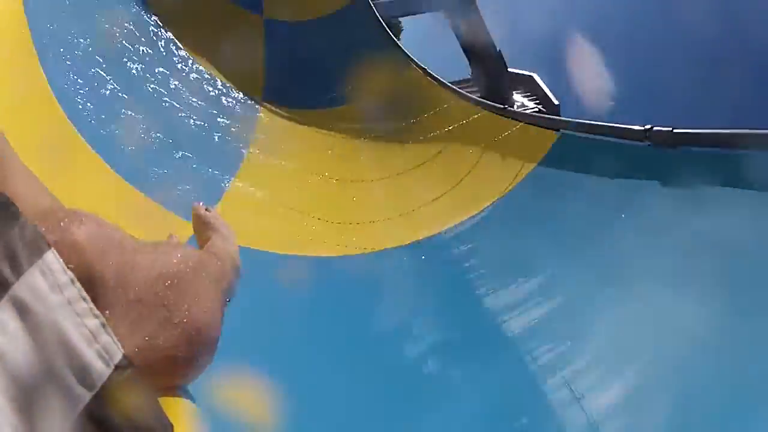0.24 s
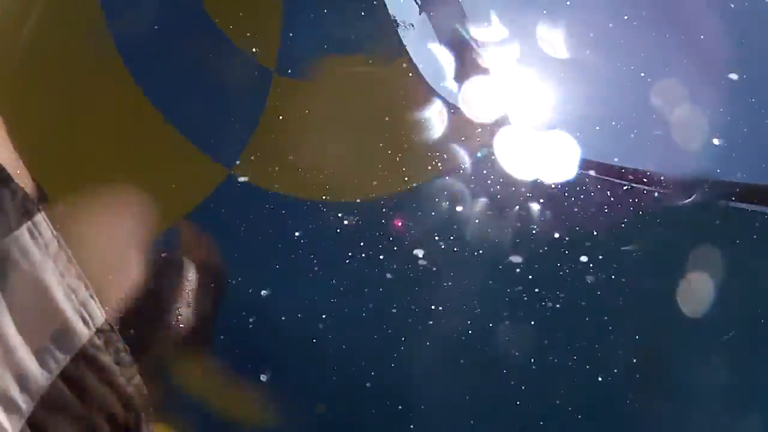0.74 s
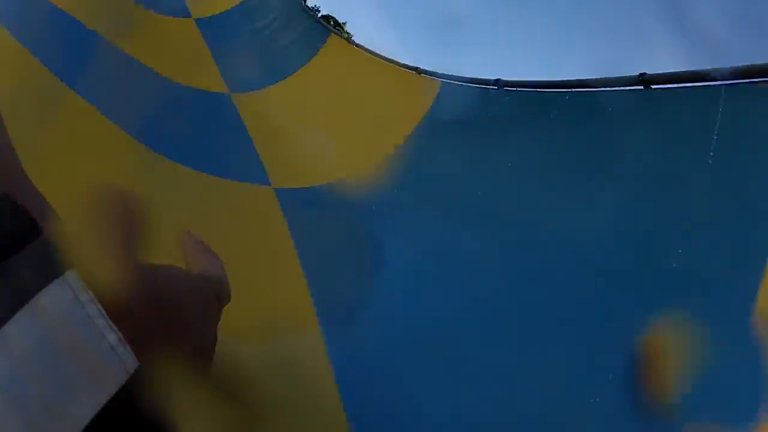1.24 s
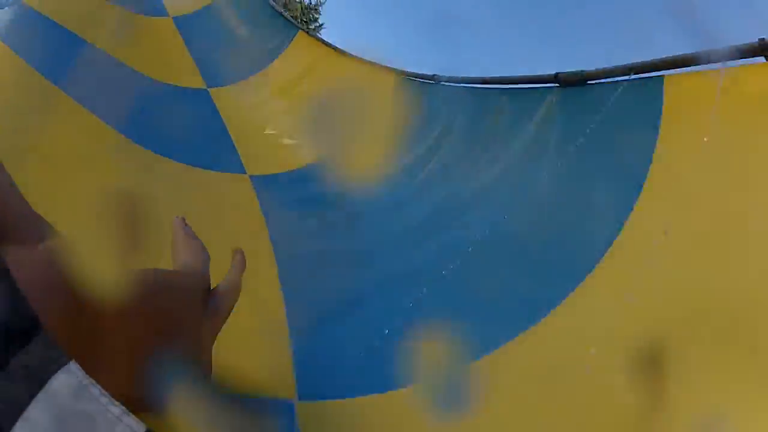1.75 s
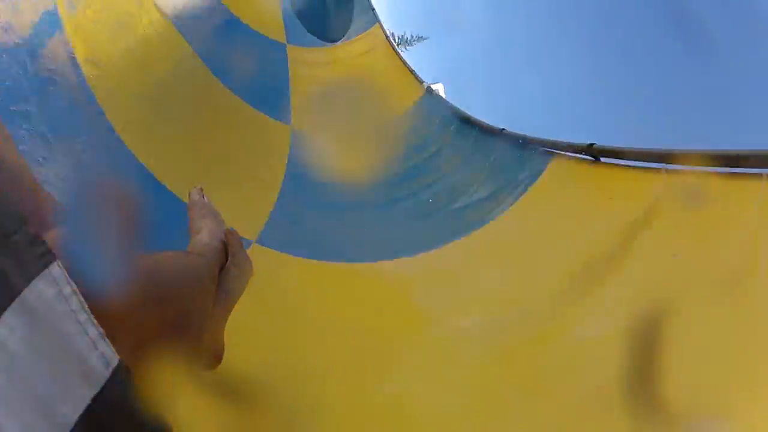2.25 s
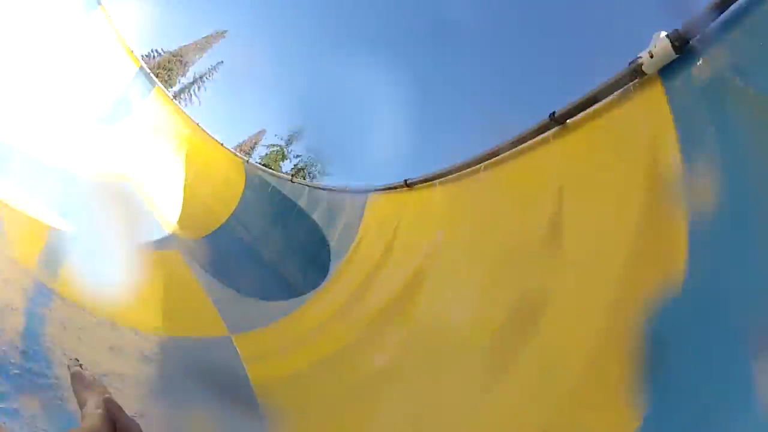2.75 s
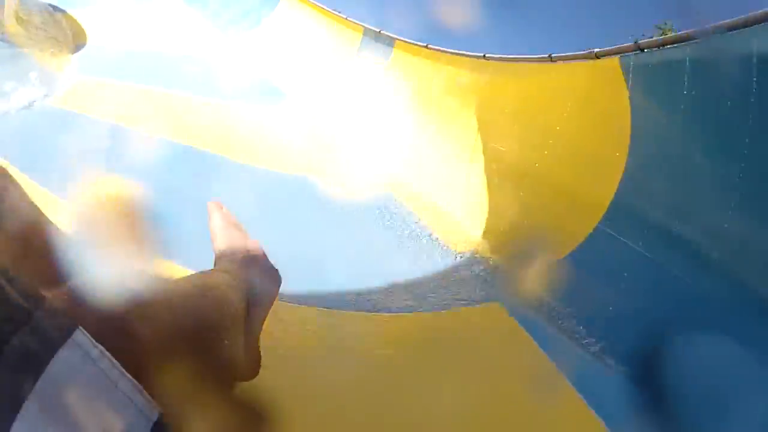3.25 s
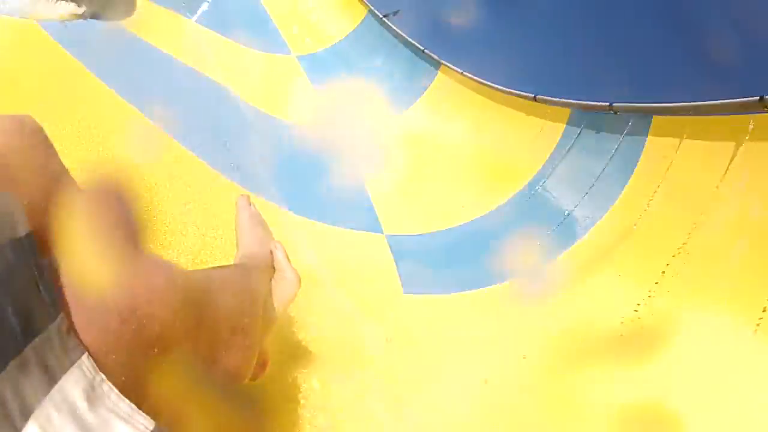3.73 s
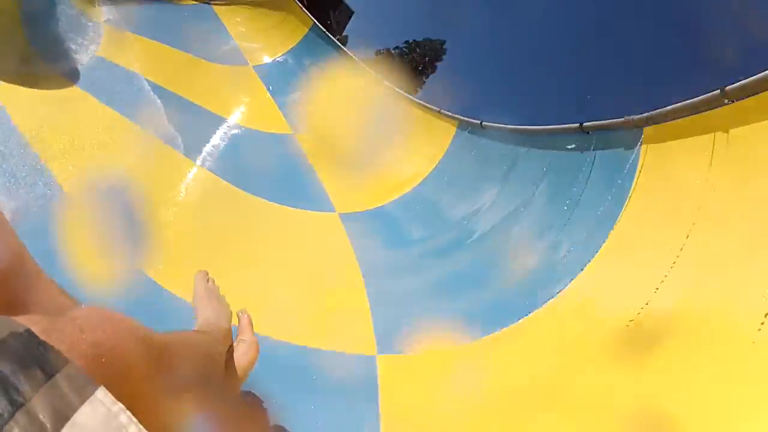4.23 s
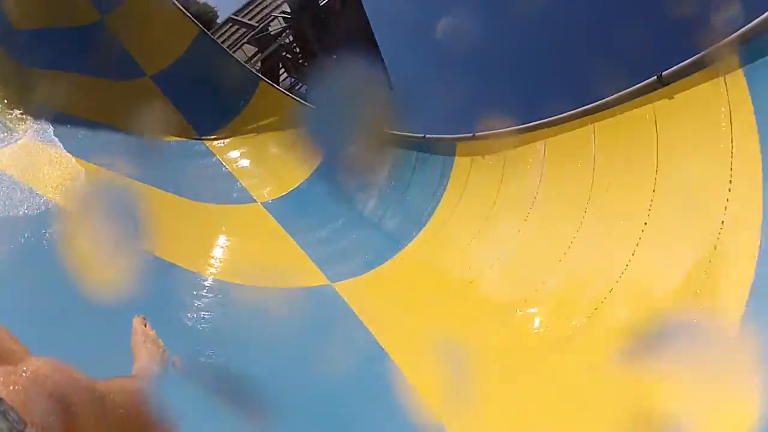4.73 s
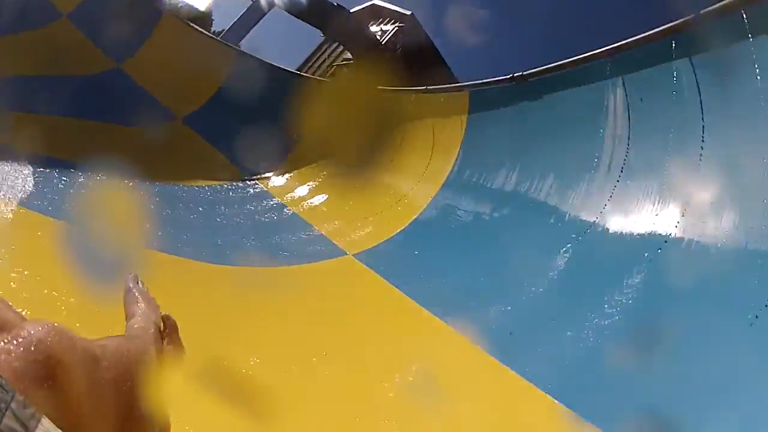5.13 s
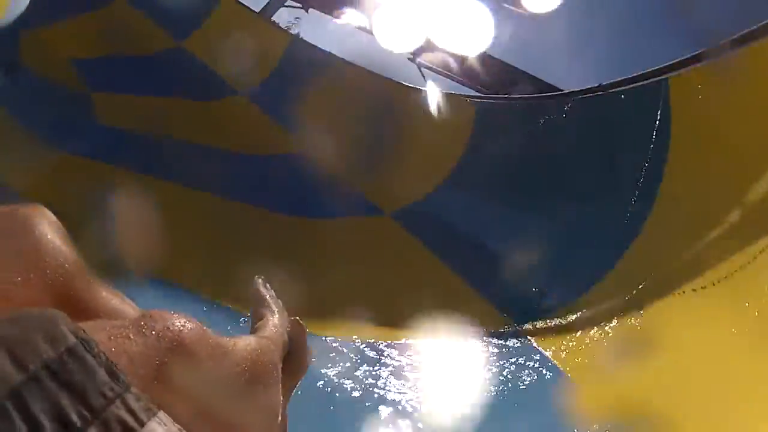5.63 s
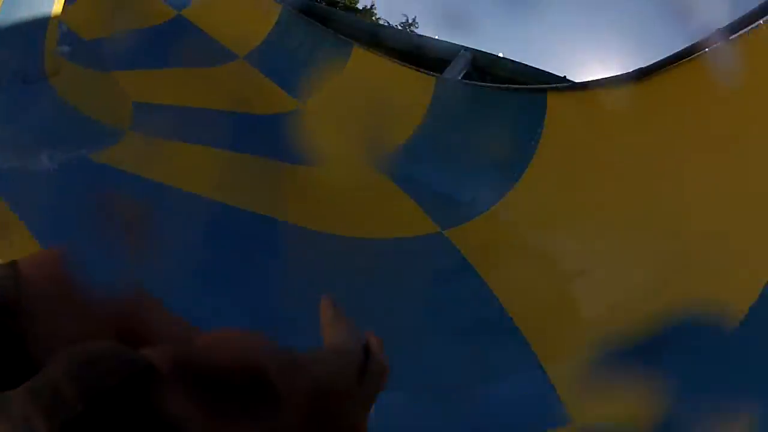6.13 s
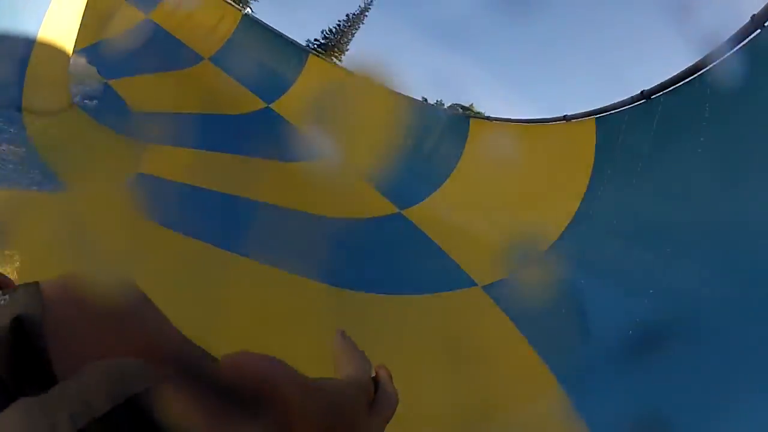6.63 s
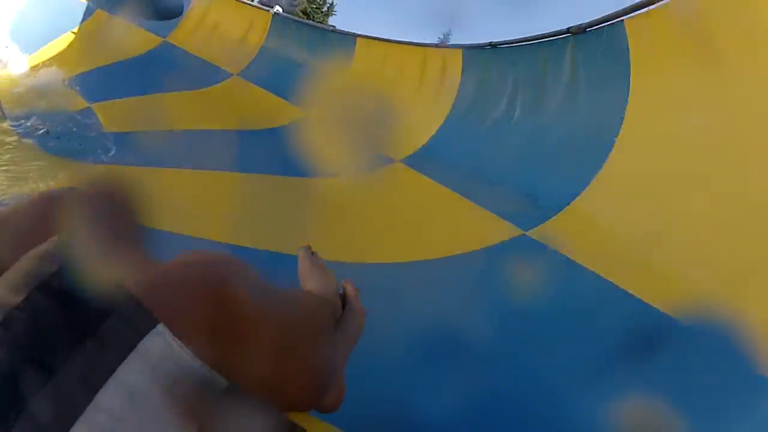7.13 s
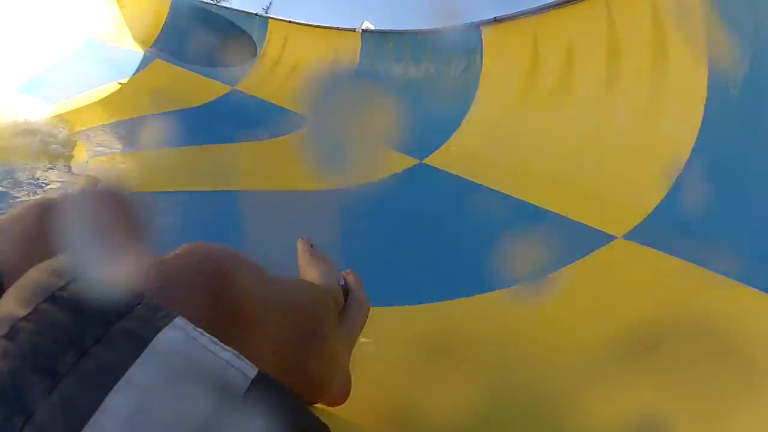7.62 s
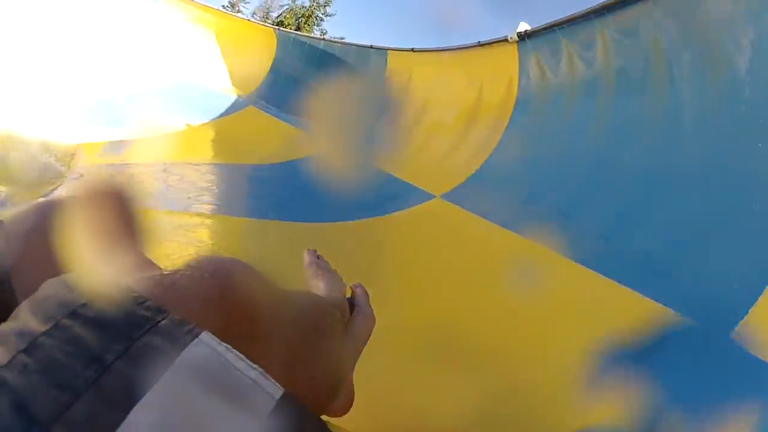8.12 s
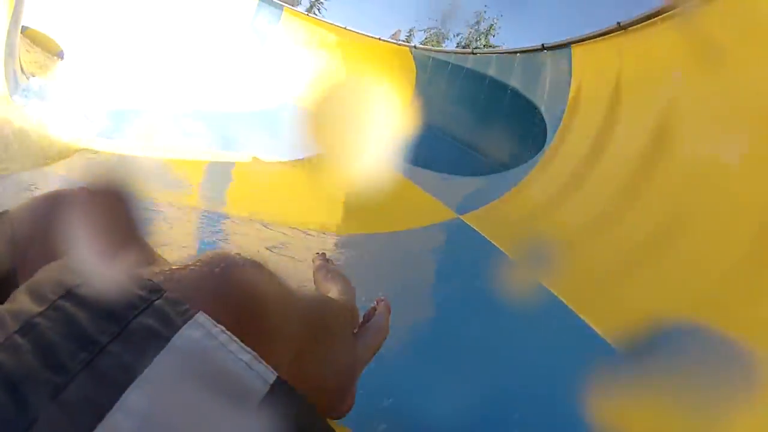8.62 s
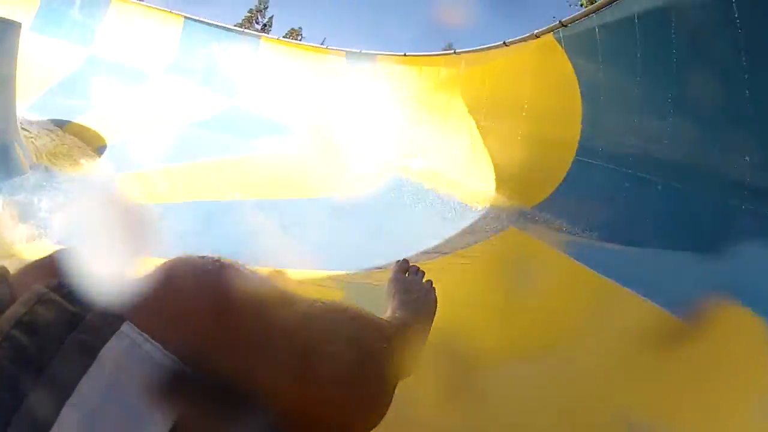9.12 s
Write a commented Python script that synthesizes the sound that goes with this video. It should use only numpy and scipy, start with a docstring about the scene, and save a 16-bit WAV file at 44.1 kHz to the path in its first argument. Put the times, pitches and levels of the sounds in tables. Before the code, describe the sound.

Muffled, lumpy rumble of a water slide ride, with rushing water and sharp, close taps of spray on a camera case.

```python
"""Down a water slide, from inside a camera case.

The microphone rides in a sealed case down a fibreglass slide into a wide bowl. The sliding body shakes
the case in low lumps, water rushes past just outside, and drops and spray knock on the shell, very close.
The recorder holds each of 12000 samples a second, which mirrors the sound into the treble."""
import sys
import numpy as np
from scipy import signal
from scipy.fft import rfft, irfft
from scipy.io import wavfile
from scipy.ndimage import uniform_filter1d

SR = 44100
rng = np.random.default_rng(int(sys.argv[2]) if len(sys.argv) > 2 else 0)


def master_out(mix):
    """Clip the mix to full scale and print it as 16-bit PCM to the path in sys.argv[1]."""
    frames = np.transpose(np.atleast_2d(mix))
    ceiling = np.clip(frames, -1, 1)
    pcm = np.round(ceiling * 32767).astype(np.int16)
    wavfile.write(sys.argv[1], SR, pcm)


N = 413216

# Water passing the case: (time [s], level [dB], middle tones [dB re level], fizz [dB re level])
WATER = [(0.0, -42.5, -4.5, -6), (0.31, -44.5, 0, 0), (0.63, -41.5, -6, -6), (0.75, -44.5, 9.5, -1.5),
         (1.23, -46.5, 4.5, -3), (1.54, -48, 14, -2), (1.8, -46.5, 2, -0.5), (2.4, -44.5, 1.5, -1.5),
         (2.61, -47, 1, 1), (3.05, -46, -2, -2.5), (3.3, -44, 5.5, -1.5), (3.62, -40, -5.5, 2.5),
         (3.81, -43.5, -0.5, 1), (3.97, -42, -6, 5.5), (4.1, -42, -11, 3), (4.25, -46, -12, -1),
         (4.91, -48, -8.5, -4), (5.4, -47, -7, -4), (5.65, -49, -6.5, -3), (6.6, -50, -9, -1.5),
         (6.85, -50, 4, -3.5), (7.15, -50, -1.5, -0.5), (7.8, -52, -4, 0.5), (8.38, -49.5, -3.5, -0.5),
         (8.6, -50, -3, 0.5), (8.9, -49, -2, 0.5), (9.37, -45.5, -4.5, 0.5)]


def gain_of(db):
    """Decibels to a factor."""
    return 10 ** (np.asarray(db) / 20)


def evened(x):
    """Scales to rms 1."""
    return x / np.sqrt(np.mean(x ** 2) + 1e-20)


def add(mix, s, sound):
    """Mixes a sound in at s seconds."""
    part = mix[round(s * SR):][:len(sound)]
    part += sound[:len(part)]


def ride(table, column, t):
    """One control of the ride at times t."""
    rows = np.array(table)
    return np.interp(t, rows[:, 0], rows[:, column])


def coloured(x, spectrum):
    """Filters x by (Hz, dB) points joined on a log-frequency axis; rms 1."""
    hz, db = np.transpose(spectrum)
    curve_db = np.interp(np.log(np.fft.rfftfreq(N, 1 / SR) + 1), np.log(hz + 1), db)
    return evened(irfft(rfft(x) * gain_of(curve_db), N))


def rush():
    """Water just outside the case: noise in drifting patches, fine droplets; near water adds middle tones."""
    # Water heard through the shell: (frequency [Hz], relative density [dB])
    spectrum = [(90, -42), (150, -8), (500, -16.5), (980, -8.5), (1500, -14), (1760, -12), (1900, -7.5),
                (2330, -3), (2700, -10), (3350, -17), (3740, -10), (4150, -21), (5300, -18.5),
                (6200, -21.5), (8000, -72)]
    droplets = gain_of(2.02 * np.minimum(rng.exponential(1, N), 5))
    droplets *= rng.random(N) < 1500 / SR  # about 1500 a second
    drive = rng.standard_normal(N) + .5 * evened(droplets * rng.standard_normal(N))
    hz, t, bands = signal.stft(coloured(drive, spectrum), SR, nperseg=512, noverlap=384)
    hz = hz[:, None]
    patches = evened(uniform_filter1d(uniform_filter1d(rng.standard_normal(bands.shape), 6, 0), 20, 1))
    flicker = evened(uniform_filter1d(rng.standard_normal(len(t)), 4))
    middle = 0.65 * np.exp(-np.log(hz / 1000 + 1e-9) ** 2 / 0.13)
    middle += 0.13 * np.exp(-((hz - 990) / 110) ** 2)  # a hollow ring
    middle += 0.54 * np.exp(-((hz - 1680) / 150) ** 2)  # fills the gap under the main band
    fizz = np.clip(np.log2(hz / 2800 + 1e-9), 0, 1)
    tone_db = middle * ride(WATER, 2, t) + fizz * ride(WATER, 3, t)
    level_db = ride(WATER, 1, t) + 0.65 * patches + 0.76 * flicker
    return signal.istft(bands * gain_of(level_db + tone_db), SR, nperseg=512, noverlap=384)[1][:N]


def shaking():
    """The body skips over the wet slide: lumpy rumble and a fuzzy drone; speed moves their tone."""
    # Rumble inside the case: (frequency [Hz], relative density [dB])
    spectrum = [(8.8, -52), (15, 5.5), (85, -5.5), (127, -4), (167, -10), (238, -17), (439, -25),
                (587, -27), (700, -33), (910, -82), (1540, -120)]
    # The skipping body: (time [s], level [dB], upper rumble [dB re deep rumble], hull drone [Hz])
    skipping = [(0.0, -40, -0.5, 101), (0.18, -36.5, 1, 91), (0.35, -45, 5.5, 78), (0.6, -37, 5, 84),
                (0.8, -39.5, 6, 112), (1.23, -35.5, -3, 85), (1.54, -39, 1, 79), (1.85, -36, -0.5, 84),
                (2.45, -43, 4.5, 106), (3.05, -36, -2.5, 75.4), (3.3, -53.5, 14, 110),
                (3.45, -35.5, 1, 112), (3.6, -26, -11.5, 117), (3.81, -39, -2, 70.5), (4.1, -40, -17, 53.4),
                (4.54, -45, 2, 53), (4.91, -51, 0, 51), (5.55, -44.5, -1, 56), (6.03, -34, -7.5, 61),
                (6.45, -43, -0.5, 82), (7.1, -44, 2.5, 60), (7.9, -38, -3.5, 102), (8.55, -38, -3, 92),
                (8.92, -39.5, -1, 75), (9.37, -48.5, 3, 60.6)]
    drone_db, drone_width_hz = -6, 40
    t = np.arange(N) / SR
    lumps = evened(uniform_filter1d(uniform_filter1d(rng.standard_normal(N), 900), 900))
    drive = rng.standard_normal(N) * gain_of(1.9 * lumps)
    rumble = coloured(drive, spectrum)
    deep = signal.sosfiltfilt(signal.butter(2, 75, fs=SR, output="sos"), rumble)
    upper = (rumble - deep) * gain_of(ride(skipping, 2, t))
    turn = np.exp(2j * np.pi * np.cumsum(ride(skipping, 3, t)) / SR)
    pole = np.exp(-np.pi * drone_width_hz / SR)
    drone = evened((turn * signal.lfilter([1], np.poly([pole, pole]), drive / turn)).real)  # moving resonance
    return (deep + upper + gain_of(drone_db) * drone) * gain_of(ride(skipping, 1, t))


def bumps():
    """Low pushes on the case, either way: a quick rise, then a swing or two that falls in pitch."""
    # Bumps of the ride: (centre time [s], peak [dB], frequency [Hz], width [cycles])
    jolts = [(0.06, -33, 440, 0.96), (0.175, -23.5, 90, 0.49), (0.272, -24.5, 94, 0.47),
             (0.48, -31, 215, 1.4), (0.527, -26, 252, 1.7), (0.539, -26.5, 183, 1.2),
             (0.598, -29.5, 244, 1.3), (0.732, -28, 170, 1.1), (0.754, -20.5, 107, 1),
             (0.852, -26.5, 286, 0.91), (0.868, -20.5, 121, 1.7), (0.957, -23.5, 119, 1.6),
             (1.149, -22, 67, 1.04), (1.184, -23, 82, 0.68), (1.247, -22.5, 79, 1.2),
             (2.088, -26, 105, 0.86), (2.201, -28, 87, 0.54), (2.429, -25.8, 104, 1.5),
             (2.529, -6.5, 304, 0.63), (2.53, -12.5, 193, 0.68), (2.771, -23, 59.6, 0.89),
             (2.861, -18.5, 72, 0.57), (3.161, -29.5, 109, 2.6), (3.272, -26, 141, 0.31),
             (3.429, -24, 104, 1.2), (3.463, -21, 96, 0.94), (3.531, -25, 115, 0.46),
             (3.624, -24, 116, 1.1), (3.659, -17.5, 88, 0.56), (3.826, -25.5, 67.5, 0.43),
             (4.018, -24, 56, 0.86), (5.264, -25, 67, 0.8), (5.705, -28, 64.6, 0.31),
             (5.796, -26, 67.5, 1.6), (6.061, -30, 60, 1.3), (6.187, -28, 64, 2.3), (6.313, -29, 93, 1.4),
             (6.505, -9.5, 192, 0.27), (7.127, -37.5, 328, 1.4), (7.129, -17, 93, 0.56),
             (7.149, -22, 51, 1.2), (7.939, -35, 85, 1.5), (9.056, -25.5, 76.5, 0.63)]
    out = np.zeros(N)
    for (s, db, hz, width), direction in zip(jolts, np.sign(rng.standard_normal(len(jolts)))):
        cycles = np.arange(-2 * SR // hz, 6 * SR // hz) * hz / SR
        swell = np.exp(-(cycles / (max(width, .3) * np.where(cycles < 0, .5, .8))) ** 2)
        swing = np.cos(2 * np.pi * (cycles - 0.016 * cycles * abs(cycles)))
        add(out, s + cycles[0] / hz, direction * gain_of(db) * swell * swing)
    return out


def shell_ring(middle_hz, low_hz):
    """Low, middle and high modes after a tap; neighbours swing opposite ways, the spot's own tones lead."""
    # Modes of the shell: (frequency [Hz], level [dB], time to fall 60 dB [s])
    modes = [(348, 2, 0.018), (570, 2, 0.0083), (874, 1.5, 0.014), (1260, 1, 0.0047), (2000, 4.5, 0.0069),
             (2200, 8.5, 0.004), (2633, 4.5, 0.0048), (3615, 5, 0.0054), (4860, -5.5, 0.01),
             (5220, -3.5, 0.0099), (5690, -5, 0.032)]
    t, parts = np.arange(1500) / SR, np.zeros((3, 1500))
    for k, (hz, db, t60) in enumerate(modes):
        part = np.searchsorted([1500, 4200], hz)
        spot_db = (-9 * abs(np.log2(hz / low_hz)), -22 * abs(np.log2(hz / middle_hz)), 0)[part]
        parts[part] += (-1) ** k * gain_of(db + spot_db - 60 * t / t60) * np.sin(2 * np.pi * hz * t)
    return parts


def knocks():
    """Drops right by the microphone: a tap, then splatter as each spreads; the water film stops the ring."""
    # Drops on the shell, with the tones each spot favours: (time [s], middle modes' peak [dB],
    # middle tone [Hz], low modes' peak [dB], high modes' peak [dB], low tone [Hz])
    drops = [(0.0891, -31, 1900, -51, -32, 1290), (0.3082, -28.5, 2340, -37, -57, 939),
             (0.5072, -41, 2380, -32, -38, 1010), (0.537, -14.5, 1980, -30, -27, 1140),
             (0.554, -35, 2450, -17.5, -35, 1180), (0.6919, -3, 1870, -8.5, -28, 870),
             (0.816, -29.5, 2550, -36, -55, 907), (0.8826, -13, 1850, -24, -35, 664),
             (2.1057, -30, 2450, -38.5, -47, 956), (2.2012, -26, 2480, -41, -34.5, 608),
             (2.2328, -33, 1790, -26.5, -60, 1040), (2.5092, -27, 2340, -34, -54, 519),
             (2.5209, -30, 1810, -17.5, -43, 870), (2.5274, -2, 2170, -6, -12.5, 780),
             (3.0174, -23.5, 2340, -33, -36, 1200), (3.258, -33, 2340, -32, -47, 1200),
             (3.2794, -27, 2660, -46, -39, 840), (3.3585, -21, 1850, -38, -52, 915),
             (3.3845, -21.5, 2200, -37, -46, 1260), (3.3945, -23, 1970, -27, -51, 910),
             (3.41, -24, 1890, -28, -49, 1300), (3.4213, -14, 1880, -24, -42, 850),
             (3.4417, -12.5, 2310, -20, -35, 1300), (3.4984, -28, 2210, -49, -53, 401),
             (3.544, -17.5, 2000, -31.5, -35, 802), (4.1058, -28.5, 2060, -35, -57, 452),
             (5.7049, -36, 1700, -41, -63, 440), (6.5024, -53, 2490, -23, -65, 680),
             (6.8144, -52, 2300, -41, -65, 991), (6.8954, -50, 2190, -38, -63, 1060),
             (6.9194, -49, 2570, -35.5, -67, 400), (7.125, -53, 2250, -44, -64, 802),
             (7.8361, -42, 1750, -41, -66, 842), (8.8878, -31, 2360, -51, -42, 474),
             (8.968, -16, 1940, -24.5, -37, 730), (9.0763, -38, 1930, -42, -42, 447)]
    spread_s, small_count = 0.0013, 24
    out, t = np.zeros(N), np.arange(1500) / SR
    when, size, tone, low = rng.random((small_count, 4)).T
    when = when * (N / SR - .1)
    peak_db = ride(WATER, 1, when) + ride(WATER, 2, when) + 5 + 5 * size  # small drops follow the rush
    small = zip(when, peak_db, 1900 + 500 * tone, peak_db - 12 * low, peak_db - 22, 800 + 300 * tone)
    film = np.exp(-(t / (5.2 * spread_s)) ** 3)
    for s, middle_db, middle_hz, low_db, high_db, low_hz in drops + list(small):
        splatter = rng.standard_normal(len(t)) * t * np.exp(-t / spread_s)
        splatter_db = -5 - 0.29 * max(middle_db, low_db)  # re the tap: harder drops sound cleaner
        push = (t == 0) + gain_of(splatter_db) * splatter / np.linalg.norm(splatter)
        parts = signal.fftconvolve(push[None], shell_ring(middle_hz, low_hz))[:, :len(t)] * film
        parts /= abs(parts).max(1, keepdims=True)
        add(out, s + .0007, -gain_of([low_db, middle_db, high_db]) @ parts)
    return out


def spray():
    """Crowds of drops of unlike size drum on the wet shell."""
    # Sheets of spray: (centre time [s], rms at the centre [dB], length [s])
    sheets = [(0.518, -39.5, 0.041), (0.536, -28, 0.0089), (0.553, -18.5, 0.046), (0.574, -31.5, 0.089),
              (0.889, -35, 0.035), (3.413, -50, 0.07)]
    drops = rng.standard_normal(N) * gain_of(1.8 * np.minimum(rng.exponential(1, N), 4))
    drops *= rng.random(N) < .1
    film = np.exp(-np.arange(1500) / 79.0)
    tap = gain_of([-8, 0, -14]) @ shell_ring(middle_hz=2280, low_hz=830) * film
    drumming = evened(signal.oaconvolve(drops, tap)[:N])
    swell = np.zeros(N)
    for s, db, length in sheets:
        add(swell, s - length / 2, gain_of(db) * np.hanning(round(length * SR)))
    return drumming * swell


def ticks():
    """Tiny bursts of high noise, about half of them followed at once by a louder one."""
    # Thin ticks: (time [s], peak [dB])
    clear = [(0.631, -37), (1.26, -38), (1.3874, -38), (1.6142, -44), (1.694, -40), (1.7574, -40),
             (1.9864, -39), (2.7741, -28.5), (2.904, -34.5), (3.231, -38.5), (3.2984, -41), (3.7234, -39),
             (4.2037, -34.5), (6.2746, -46), (6.328, -49), (7.0469, -42), (7.2463, -39), (7.3033, -43),
             (7.9099, -44), (9.02, -42), (9.0828, -36), (9.0974, -46), (9.1341, -48), (9.19, -38.5)]
    faint = [(s, -49.5) for s in rng.uniform(0, N / SR, size=14)]
    decay_s, follow_s, follow_db = 0.0012, 0.008, 3
    out, t = np.zeros(N), np.arange(600) / SR
    band = signal.butter(2, (4870, 5740), "bandpass", fs=SR, output="sos")
    for s, db in clear + faint:
        noise = rng.standard_normal((2, len(t)))
        first, second = signal.sosfilt(band, noise * np.exp(-t / decay_s))
        add(out, s, gain_of(db) * first / abs(first).max())
        if noise[0, -1] > 0:  # an even chance
            add(out, s + follow_s, gain_of(db + follow_db) * second / abs(second).max())
    return out


def scene():
    """One microphone inside the case, on both channels."""
    return np.tile(rush() + shaking() + knocks() + spray() + bumps() + ticks(), (2, 1))


def record(dry):
    """The recorder limits the band, overloads and holds its samples, mirroring the sound about 6 and 12 kHz."""
    band_hz, edge_hz = 5800, 15290
    limited = signal.oaconvolve(dry, signal.firwin(63, band_hz, window=("kaiser", 5), fs=SR)[None], "same")
    slow = signal.resample_poly(limited, 40, 147, axis=1, window=("kaiser", 4))  # 12000 samples a second
    held = np.repeat(np.clip(slow, -1, 1), 4, axis=1)
    steps = signal.resample_poly(held, 147, 160, axis=1, window=("kaiser", 9))[:, :N]  # back to SR
    steps = np.pad(steps, ((0, 0), (0, N - steps.shape[1])))
    top_edge = signal.firwin(1023, edge_hz, window=("kaiser", 9), fs=SR)
    return signal.oaconvolve(steps, top_edge[None], "same")


dry = scene()
out = record(dry)
master_out(out)
```